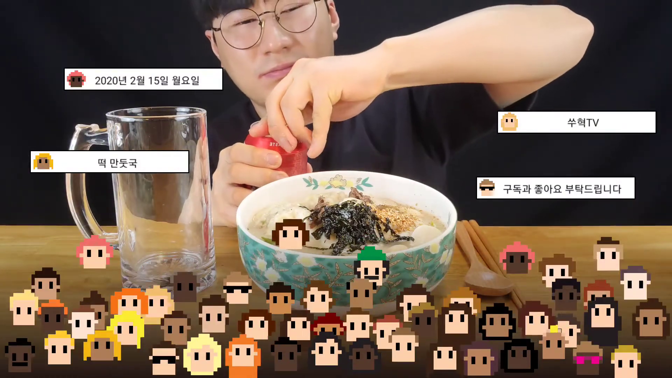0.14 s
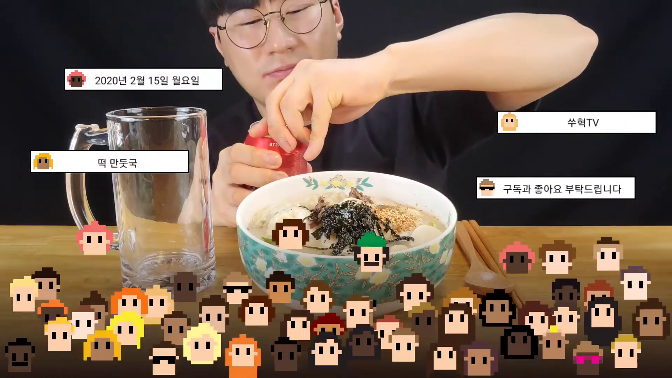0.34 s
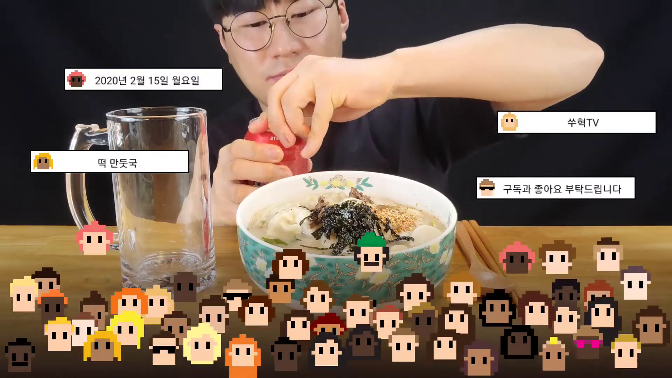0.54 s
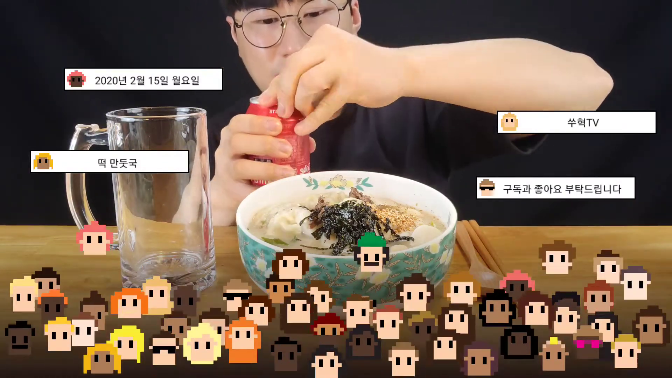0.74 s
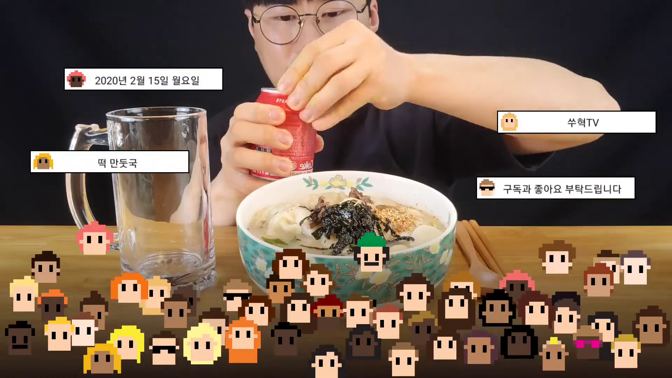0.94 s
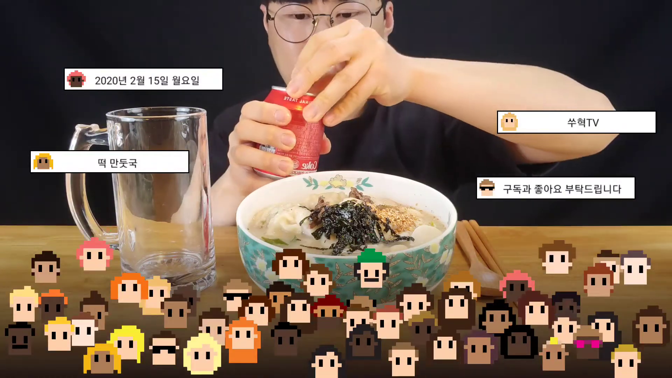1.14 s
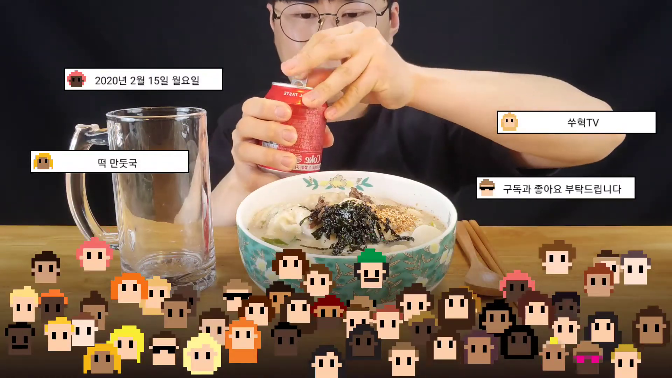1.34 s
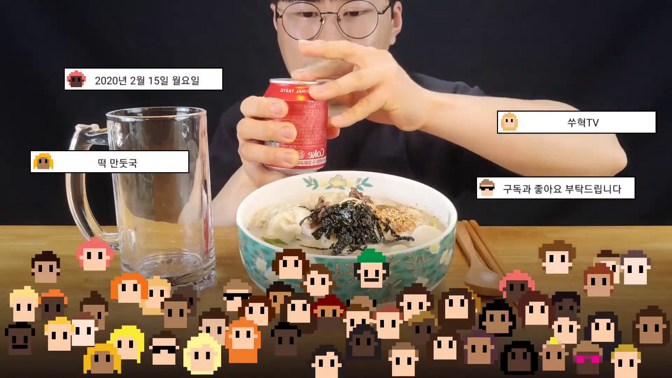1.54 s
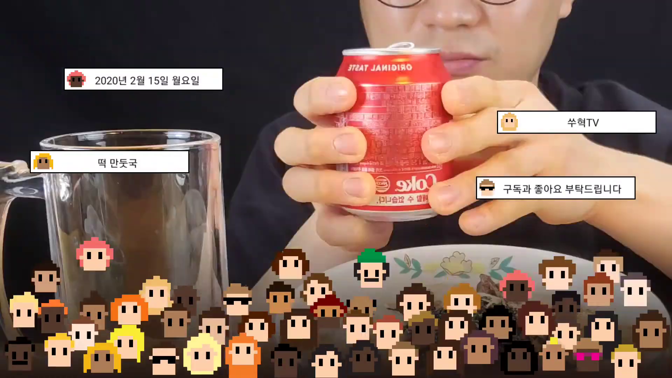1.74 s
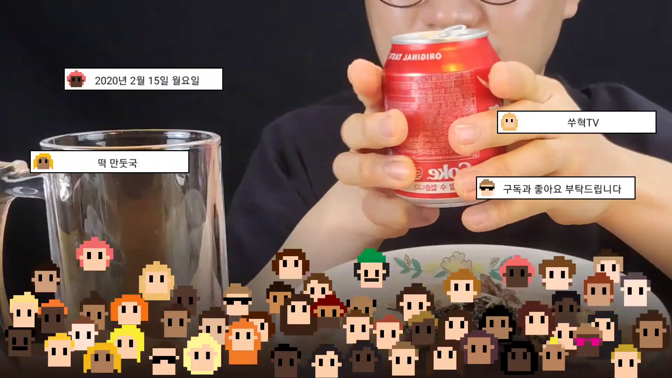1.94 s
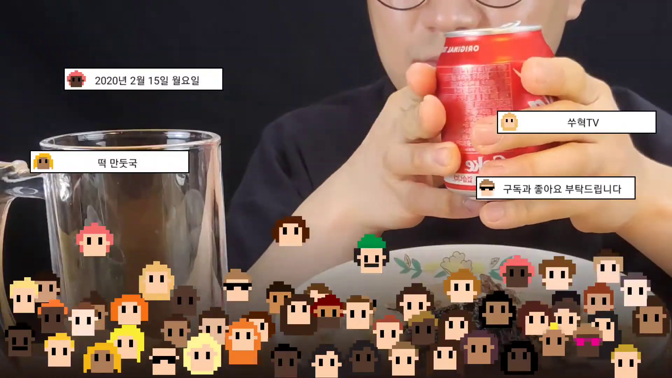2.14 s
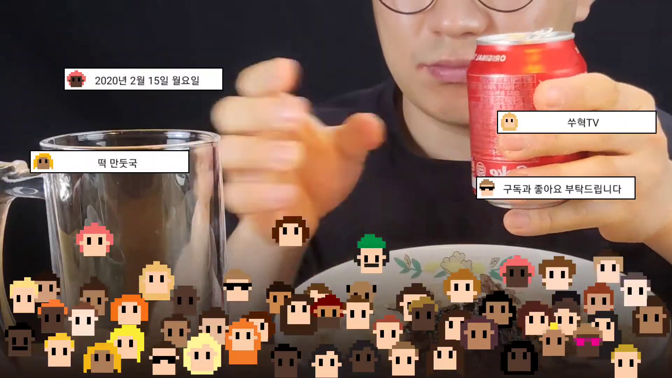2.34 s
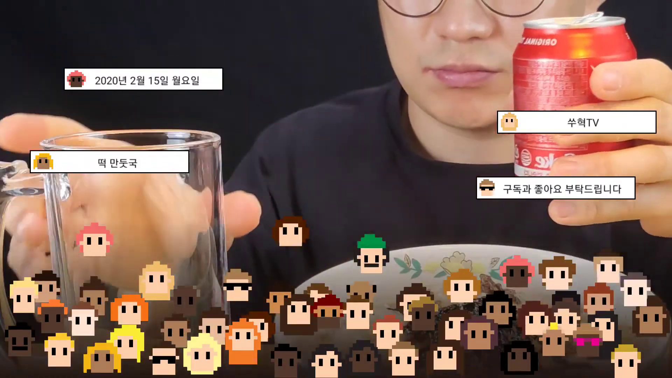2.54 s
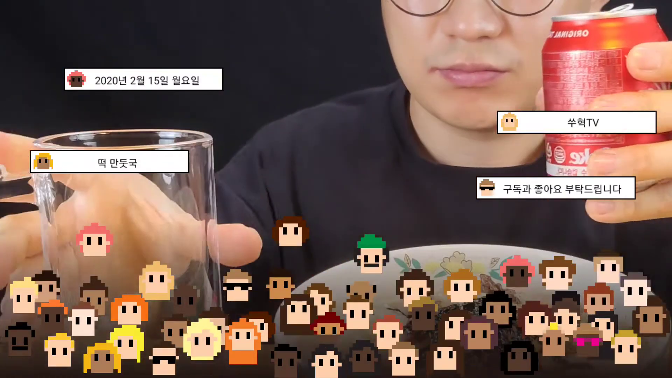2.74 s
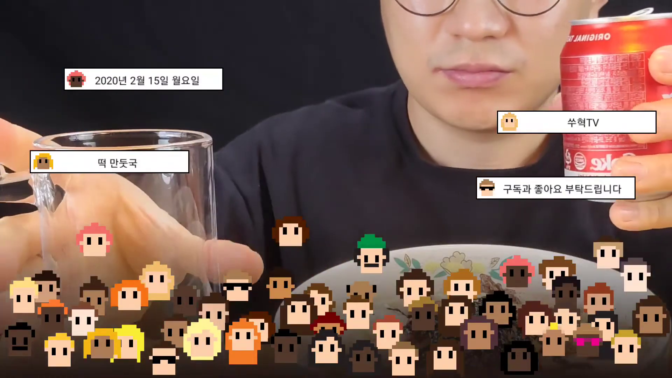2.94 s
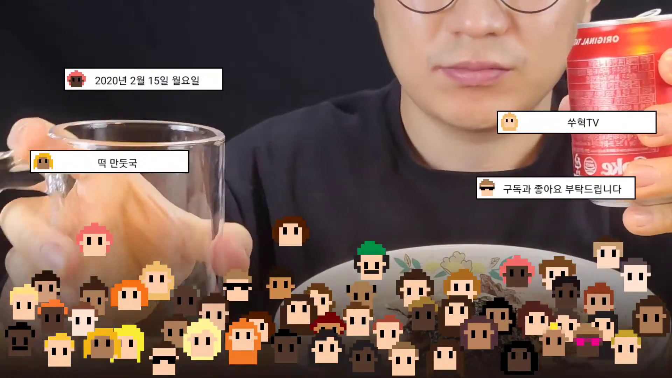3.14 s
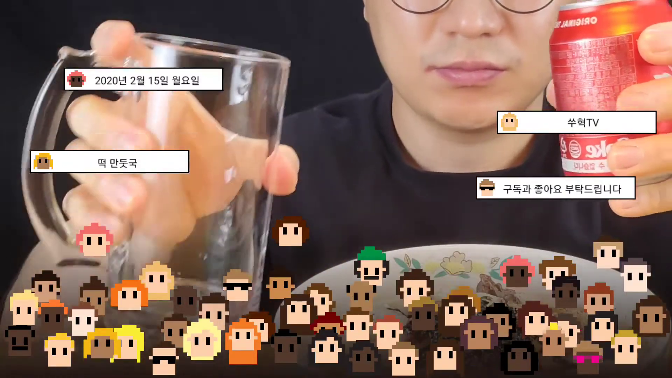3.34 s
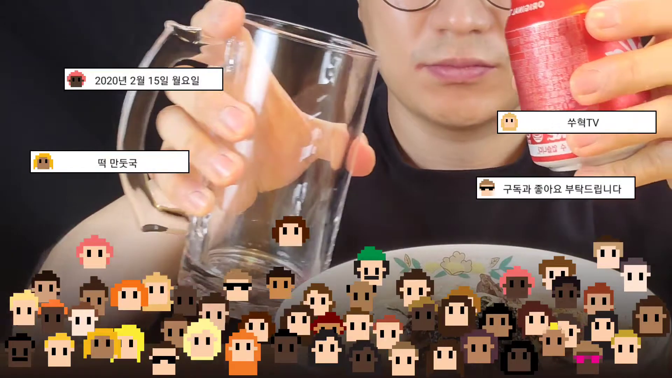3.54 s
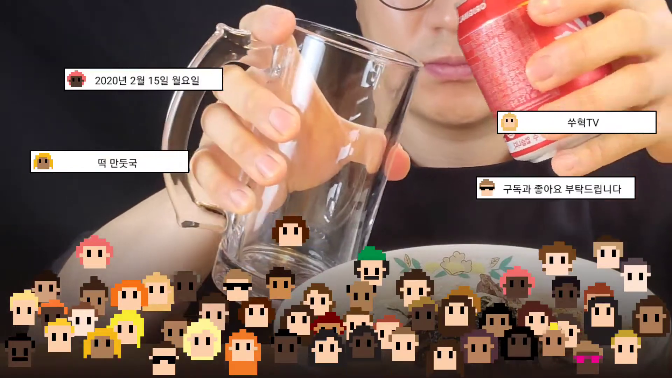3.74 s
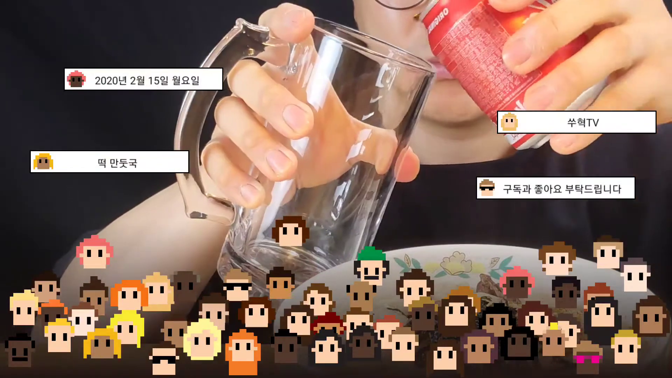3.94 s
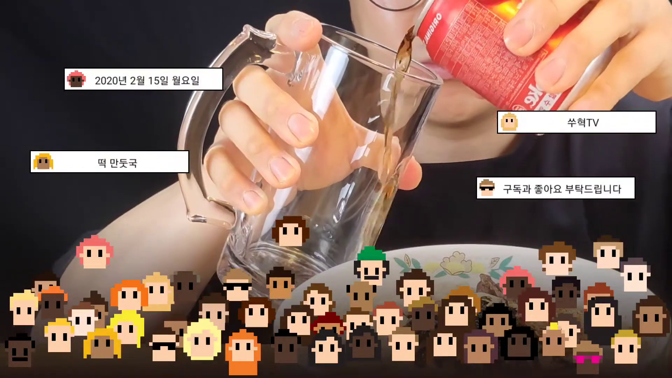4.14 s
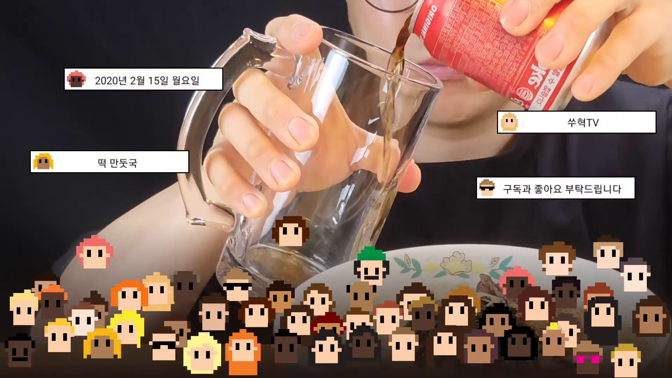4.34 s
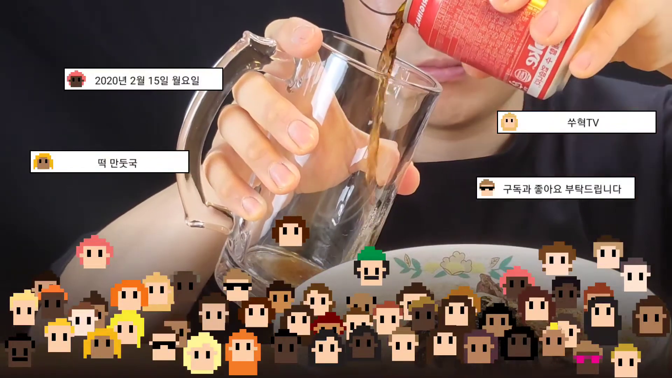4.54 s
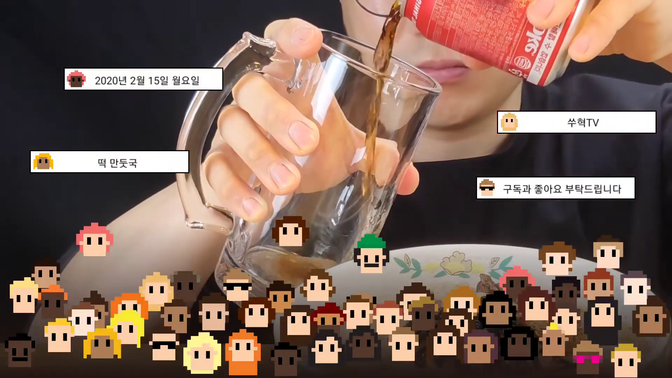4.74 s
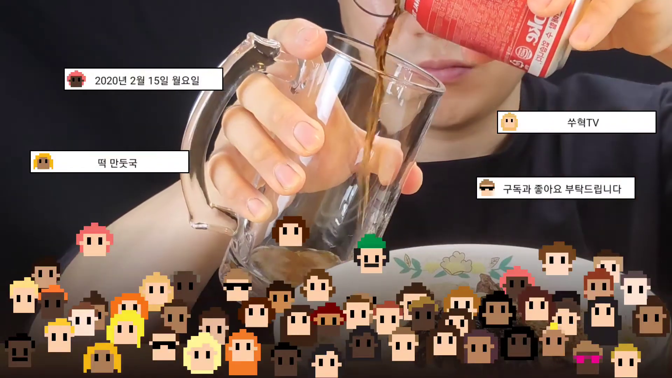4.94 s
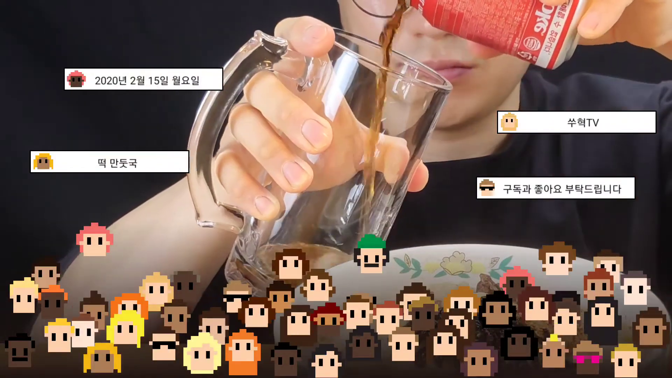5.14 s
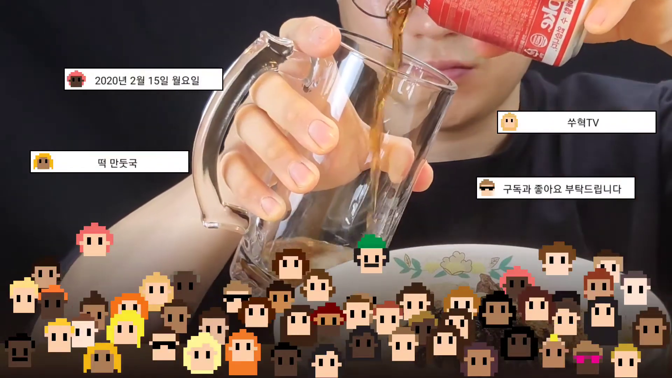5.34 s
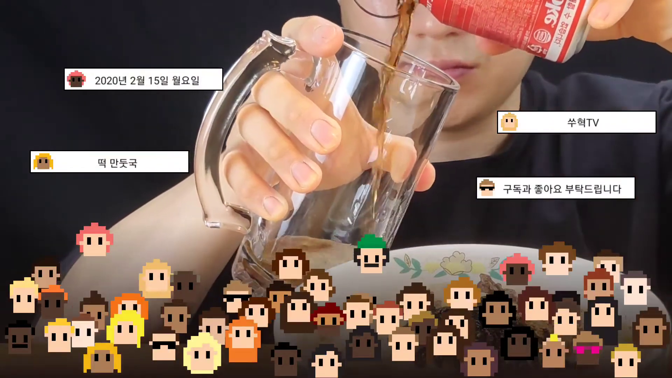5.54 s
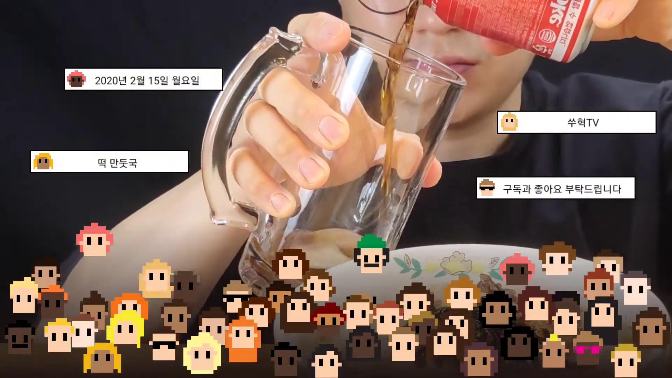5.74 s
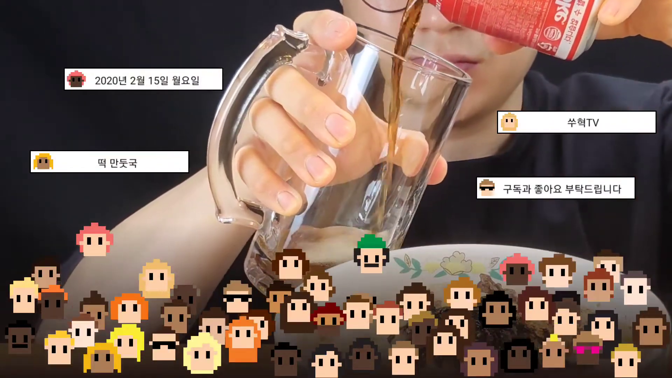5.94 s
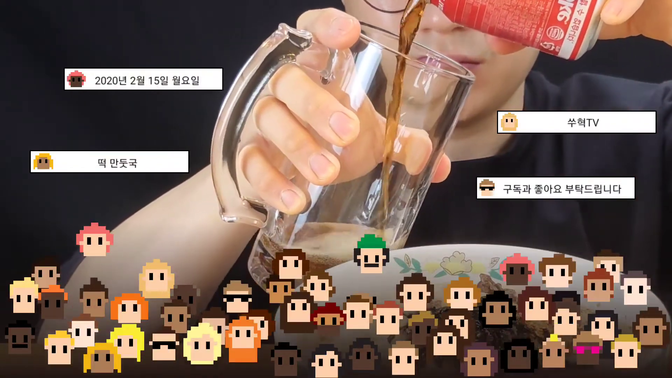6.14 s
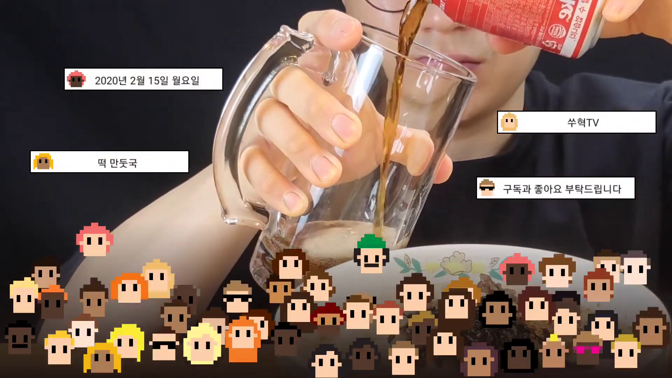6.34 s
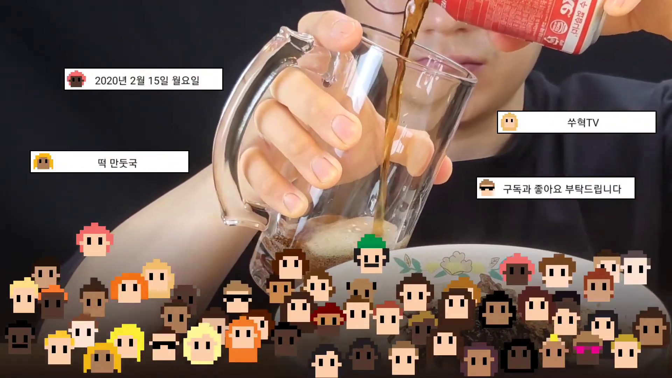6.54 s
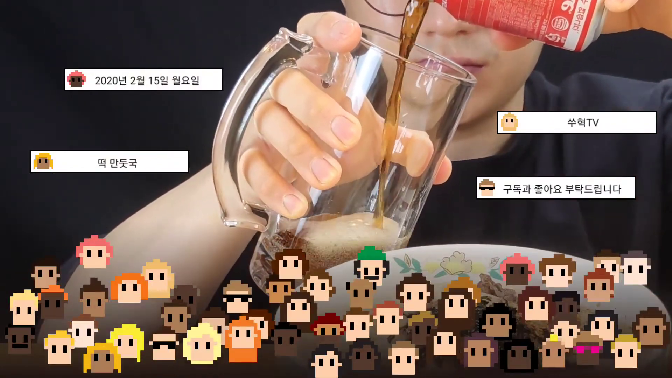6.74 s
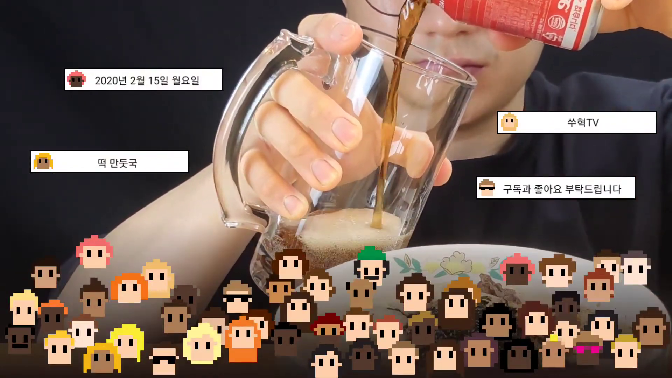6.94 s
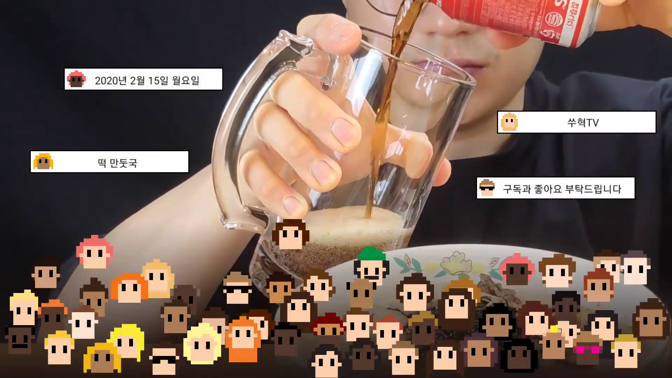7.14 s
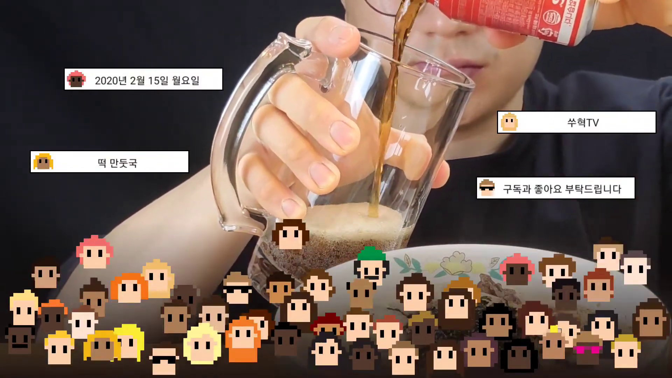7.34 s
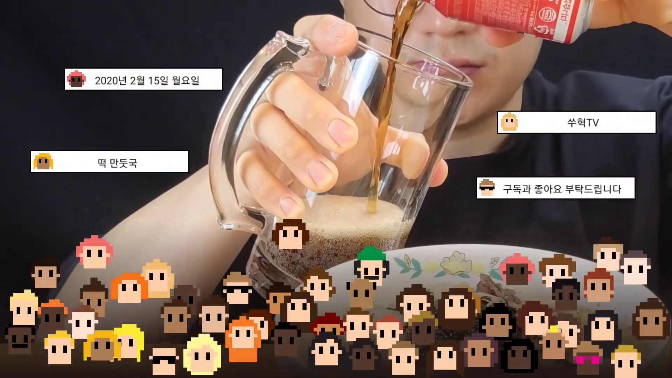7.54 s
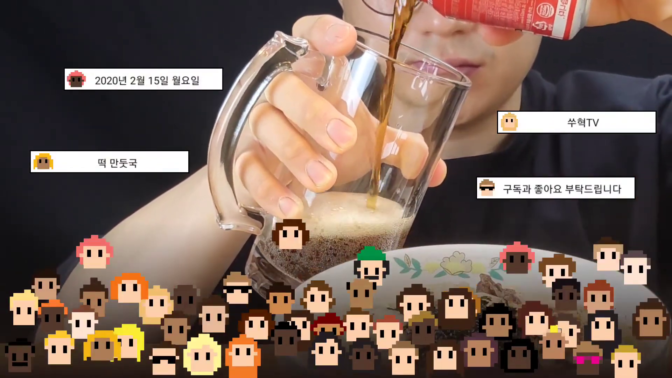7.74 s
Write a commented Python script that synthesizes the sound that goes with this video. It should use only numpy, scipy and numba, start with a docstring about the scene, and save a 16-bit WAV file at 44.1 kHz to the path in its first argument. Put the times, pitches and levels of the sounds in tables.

```python
"""Opening a can and pouring a fizzy drink

Over a background of rumble and hiss, a can is cracked open close by: gas bursts, tab ticks, pops of the thin wall.
A glass mug scrapes over the table in short pulls of stick and slip, which shake the notes of the wood.
The drink glugs, slaps and plops into the mug as short sliding tones, while random drops ring
an air column that rises in pitch as the mug fills, and foam fizzes as bursting treble noise."""
import sys
import numpy as np
from scipy import signal
from scipy.fft import rfft, irfft, next_fast_len
from scipy.io import wavfile
from scipy.ndimage import uniform_filter1d
from numba import njit

SR = 44100
rng = np.random.default_rng(int(sys.argv[2]) if len(sys.argv) > 2 else 0)


def persist_wave(psi):
    """Save psi, clipped to +-1, as 16-bit WAV."""
    counts = np.round(np.clip(psi, -1, 1) * 32767).astype(np.int16)
    wavfile.write(sys.argv[1], SR, np.atleast_2d(counts).T)


N = 342657  # length in samples

# Tone colour of the noise at the lid. Each row: pitch in Hz, strength in dB per Hz.
LID_COLOUR = [(290, -66), (500, -30), (1020, -31), (1340, -4.5), (1570, -3), (2130, 5.5), (4210, -10),
              (4530, -9.5), (6700, -12.5), (12000, -16), (13400, -25), (14900, -25), (16000, -50)]
# Notes of the metal lid. Each row: pitch in Hz, width in Hz, level in dB.
LID_MODES = [(1850, 52, -13.5), (4040, 53, 0), (4350, 37, 6), (4400, 88, 3), (4960, 140, -6),
             (6510, 100, -16), (8100, 110, -33.5), (8800, 110, -16), (8800, 140, -17), (9100, 100, 3),
             (11000, 260, -18.5), (11900, 150, -40)]
# Metal cracks and gas bursts out. Each row: start in seconds, level in dB, ring pitch in Hz, ring level in dB,
# low noise in dB, treble in dB, basic fade time in seconds.
BURSTS = [(0.343, -20, 2600, -27, -22, -1, 0.02), (0.3655, -22, 2580, -37, -37, 4.5, 0.072),
          (0.377, -26.5, 1450, -34, -30, 4.5, 0.28), (0.4216, -12.5, 2620, -29, -5, 1.5, 0.042),
          (0.4336, -8, 1285, -10, -19, -6, 0.16), (0.457, -12, 1350, -19, -31, -7, 0.18),
          (0.5703, -16, 1570, -17, -24, -2, 0.047), (0.583, -27, 1504, -8.5, -19.5, 0, 0.17),
          (1.2608, -2, 2320, -16, 1, -15.5, 0.043), (1.2658, -11, 2040, -13.5, -28, -10.5, 0.22),
          (1.284, -18, 2360, -17, -1, -6.5, 0.18)]
# Notes of the table top, the boom first. Each row: pitch in Hz, level in dB, ring length in seconds.
TABLE_MODES = [(190.4, 1.5, 0.97), (280, 1, 0.35), (412, 7.5, 0.2), (550, -13, 0.91), (655, -19, 0.16),
               (750, -3.5, 0.4), (866, 0, 0.42), (930, -44, 0.24), (1030, -39, 0.54)]
# The flow of the pour. Each row: time in seconds, then air column, splash, froth and fizz in dB.
POUR_LEVELS = [(4.2, -65, -67, -52, -62), (4.35, -69, -72, -59, -47), (4.55, -47.5, -41, -44, -43.5),
               (4.8, -55, -36.5, -75, -39.5), (5.0, -39, -37.5, -52, -34), (5.12, -43, -33, -43, -39),
               (5.5, -31.5, -35, -42, -37.5), (5.75, -26.5, -35.5, -53, -38.5), (5.9, -38, -37, -56, -42),
               (6.2, -39, -39.5, -47, -43), (6.4, -35.5, -36.5, -41.5, -42), (6.81, -35, -35.5, -42, -43),
               (7.1, -35, -33, -41, -38.5), (7.66, -28, -26, -38.5, -32.5), (7.77, -30, -25.5, -42, -31.5)]
# The stream slaps the glass. Each row: start in seconds, level in dB, pitch in Hz.
SLAPS = [(4.4674, -15, 3680), (4.5221, -21, 3490), (4.612, -2.5, 2330), (4.6264, -2, 2160),
         (4.6707, -1.5, 1830), (4.6975, -6.5, 3760), (4.7248, -0.5, 3530), (4.814, -13, 3480),
         (4.8674, -4.5, 1520), (4.9011, -0.5, 1600), (4.9561, -7.5, 1650), (4.976, -8, 1640),
         (4.9866, -9, 3600), (5.007, 2.5, 1630), (5.051, -1.5, 1360), (5.0875, 1, 1500), (5.116, -1, 1090),
         (5.16, -8, 3430), (5.237, -8, 3650), (5.252, 1, 1600), (5.2968, -1, 1770), (5.3124, -6, 1380),
         (5.3815, -1.5, 1270), (5.4568, -6.5, 3220), (5.4671, -3.5, 1350), (5.55, -3, 1610),
         (5.6107, -7, 1370), (5.627, -5, 1660), (5.6883, 0, 3560), (5.7264, -7, 1560), (5.7675, -3, 3420),
         (5.793, -16, 3520), (5.8625, -7.5, 1820), (5.8935, -9, 1320), (5.913, -10.5, 3720),
         (5.9587, -4, 1360), (5.9953, -10, 1640), (6.041, -5, 1530), (6.0821, -8.5, 1840),
         (6.1706, -10.5, 1800), (6.1877, -11.5, 1440), (6.2721, -11, 1810), (6.356, -20, 1830),
         (6.42, -17, 1630), (6.447, -18, 1790), (6.464, -20, 1820), (6.4925, -13.5, 1860),
         (6.626, -17, 1790), (6.5573, -17.5, 1790), (6.5836, -17, 1430), (6.8682, -17, 1730),
         (7.1336, -22, 1850), (7.483, -12, 1280), (7.644, -12, 1270)]
# Big bubbles close in the pool. Each row: start in seconds, level in dB, pitch in Hz, cycles until faded.
PLOPS = [(4.866, -24, 603, 11), (5.026, 0.5, 1080, 6.1), (5.05, -10, 610, 15), (5.071, 10.5, 697, 7.5),
         (5.115, 7, 607, 6), (5.27, 1, 1170, 10), (5.297, -7.5, 1030, 18), (5.313, -17, 617, 19),
         (5.38, -6.5, 840, 30), (5.393, -5, 900, 17), (5.409, 5, 660, 15.5), (5.424, -8, 640, 17),
         (5.446, -8, 680, 19), (5.467, 0.5, 830, 12.5), (5.543, 4, 622, 16.2), (5.614, 2.5, 690, 19),
         (5.698, 6, 675, 16), (5.712, 0, 800, 18), (5.726, -2, 700, 13), (5.741, 5.5, 675, 13),
         (5.777, -7, 627, 15), (5.796, -6.5, 797, 25), (5.834, -18, 800, 19), (5.858, 2.5, 732, 25),
         (5.895, 3, 644, 18.3), (5.914, -1.5, 613, 16), (5.959, -5.5, 620, 15), (5.989, 3.5, 625, 20),
         (6.027, -5.5, 607, 17), (6.056, -1.5, 655, 15), (6.084, 0, 667, 23), (6.123, -15, 615, 12),
         (6.136, -5, 640, 18), (6.171, 0, 627, 13.5), (6.19, -4, 633, 19), (6.272, -10, 610, 9.9),
         (6.302, -13, 595, 10), (6.315, -13, 654, 16), (6.356, -8, 536, 9.7), (6.382, -13, 640, 9.4),
         (6.491, -14.5, 516, 9.1), (6.558, -12.5, 620, 8.4), (6.868, -12.5, 690, 9.9),
         (6.902, -14, 680, 22), (6.949, -10.5, 720, 17.5), (6.973, -15, 646, 19), (7.006, -9.5, 750, 16.4),
         (7.122, -13, 720, 23), (7.134, -12, 700, 20), (7.164, -14, 688, 23), (7.183, -11.5, 702, 34),
         (7.221, -10, 722, 23), (7.247, -13, 698, 31), (7.277, -8.5, 707, 18), (7.421, -12, 724, 27),
         (7.465, -12, 770, 19), (7.483, -6.5, 694, 19.5), (7.502, -20, 694, 13), (7.614, -14, 720, 30),
         (7.647, -5, 725, 12), (7.677, -5.5, 702, 16), (7.711, -17, 708, 13)]

# How much louder the left side is, in dB
BURST_PAN_DB, SLIDE_PAN_DB, RUMBLE_PAN_DB, POUR_PAN_DB = 1.5, 4, -4.5, 4


def undb(db):
    """Decibels to gain."""
    return 10 ** (np.asarray(db) / 20)


def unit(x):
    """Scale to an rms (average strength) of 1."""
    return x / np.sqrt(np.mean(x ** 2))


def peak(x):
    """Scale to a largest swing of 1."""
    return x / np.abs(x).max()


def curves(table):
    """Columns of a table at every sample, then a gate that is 0 before its start and soon after its end."""
    s, *columns = np.transpose(table)
    t = np.arange(N) / SR
    gate = np.clip(np.minimum(t - s[0], s[-1] - t + 0.036) / 0.026, 0, 1)
    return [np.interp(t, s, c) for c in columns] + [gate]


def tinted(points, lo_hz=0, hi_hz=SR):
    """Noise with a spectrum drawn through (Hz, dB) points, kept between two soft edges."""
    n = next_fast_len(N)
    f = np.maximum(np.fft.rfftfreq(n, 1 / SR), 1)
    hz, db = np.transpose(points)
    colour = undb(np.interp(np.log(f), np.log(hz), db))
    edges = 1 / (1 + (lo_hz / f) ** 6) / (1 + (f / hi_hz) ** 6)
    return unit(irfft(rfft(rng.standard_normal(n)) * colour * edges, n)[:N])


def wide(points, lo_hz, share):
    """Treble noise that differs between the sides by the given share."""
    middle = tinted(points, lo_hz=lo_hz)
    return middle + share * tinted(points, lo_hz=lo_hz) * np.array([[1], [-1]])


def walk(rate):
    """Random levels, a new one every 1 / rate seconds, joined by straight slopes; spread near 1."""
    k = int(SR / rate)
    return uniform_filter1d(np.repeat(rng.standard_normal(N // k + 1), k), k)[:N]


def crackle(rate, spread_db):
    """Clicks at random moments, rate per second, a few much louder than the rest."""
    chance = rng.random((N, 2))
    happens = chance[:, 0] < rate / SR
    return happens * undb(-spread_db * np.log(1 - chance[:, 1])) * rng.choice([-1, 1], N)


def place(x, pan_db):
    """Two channels, the left louder by pan_db."""
    return x * undb(np.array([pan_db / 2, -pan_db / 2])).reshape(2, -1)


@njit
def svf(x, hz, width):
    """State-variable band-pass: a resonance whose centre can move, gain 1 there."""
    y, b, l = np.empty(len(x)), 0., 0.
    for i in range(len(x)):
        g, k = np.tan(np.pi * hz[i] / SR), width / hz[i]
        v = (b + g * (x[i] - l)) / (1 + g * (g + k))
        b, l, y[i] = 2 * v - b, l + 2 * g * v, k * v
    return y


def band(x, hz, width):
    """Fixed band-pass: a resonance with gain 1 at the centre."""
    w = 2 * np.pi * hz / SR
    a = np.sin(w) * width / hz / 2
    return signal.lfilter([a, 0, -a], [1 + a, -2 * np.cos(w), 1 - a], x)


def rung(push, hz, width):
    """A short push through one resonance, with time to ring out."""
    return band(np.append(push, np.zeros(int(2.5 * SR / width))), hz, width)


def add(out, s, sound, pan_db):
    """Mix a short sound in at a time and a side."""
    i = int(s * SR)
    n = min(sound.shape[-1], N - i)
    out[:, i:i + n] += place(sound[..., :n], pan_db)


def ring(hz, t60, glide=0., rise=0.00018):
    """A sine that fades 60 dB in t60 seconds while its pitch slides by the share glide."""
    t = np.arange(int(t60 * SR) + 8) / SR
    tone = np.sin(2 * np.pi * hz * t * (1 + glide * t / t60 / 2))
    return tone * undb(-60 * t / t60) * (1 - np.exp(-t / rise))


def puff(noise, s, t60, rise):
    """A piece of the noise, taken from time s, that swells and then fades."""
    t = np.arange(int(t60 * SR) + 8) / SR
    piece = noise[..., (int(s * SR) + np.arange(len(t))) % N]
    shape = undb(-60 * t / t60) * (1 - np.exp(-t / rise)) ** 2
    return piece * shape / shape.max()


def swell(s, hold, db, attack, fade_db_s):
    """Gain of events that rise, hold and fade; the power of all is summed."""
    power = np.zeros(N)
    for start, length, level_db in np.broadcast(s, hold, db):
        i = int(start * SR)
        t = np.arange(min(SR, N - i)) / SR
        gain = undb(level_db - fade_db_s * np.maximum(t - length, 0)) * np.minimum(t / attack, 1)
        power[i:i + len(t)] += gain ** 2
    return np.sqrt(power)


def background():
    """Rumble and hiss behind the near sounds: the room tone, and a treble haze as the pour begins.

    Each band is noise partly shared by both sides; the deepest shared part is in opposite phase."""
    # Background level: high at first, sinks after the can cracks open, swells again around the mug scrapes
    # and the pour. Each row: time in seconds, then deep, bass, mid hiss and treble hiss in dB.
    background_levels = [(0.0, -62, -38, -48, -51.5), (0.34, -64, -38.5, -45.5, -52),
                         (0.52, -64, -56.5, -60, -55), (0.8, -82, -55, -56.5, -66),
                         (1.1, -77, -57, -68, -66.5), (1.5, -82, -53, -61, -61.5),
                         (1.95, -59, -53, -61, -59.5), (2.3, -58, -49, -54.5, -53.5),
                         (2.65, -60, -37, -47, -49), (2.8, -33.5, -42, -46, -46.5),
                         (3.05, -45, -28, -49, -49), (3.3, -39, -43, -51, -49),
                         (3.62, -47, -51, -52.5, -48), (3.9, -46.5, -36, -47, -49.5),
                         (4.5, -45.5, -39.5, -45.5, -42), (5.2, -45, -37.5, -62, -58),
                         (5.8, -59, -48.5, -62, -62), (7.1, -61, -45.5, -64, -62),
                         (7.5, -51, -41.5, -62, -62), (7.77, -55, -43, -62, -62)]
    # Each row: pitch in Hz, strength in dB per Hz.
    background_colour = [(15, -45.5), (25, -23), (59, 5), (185, 0), (463, -8), (641, -18.5), (887, -18.5),
                         (1020, -25.5), (1230, -19.5), (1700, -26.5), (2110, -23.5), (2410, -25),
                         (3620, -28), (14800, -29.5), (16000, -32)]
    deep_db, bass_db, hiss_db, treble_db, _ = curves(background_levels)
    # Each row: lower and upper edge in Hz, gain, waver in dB, shared part on the left and on the right.
    bands = [(0, 94, undb(deep_db + 6.5), 3.5, 0.6, -0.18),
             (82.0, 1200, undb(bass_db), 3.5, 0.49, 0.38),
             (680, 5300, undb(hiss_db), .8, 0.56, 0.42),
             (4230, SR, undb(treble_db), .8, 0.52, 0.27)]
    out = 0
    for lo_hz, hi_hz, gain, waver_db, left, right in bands:
        noise = tinted(background_colour, lo_hz, hi_hz)
        own = np.array([np.roll(noise, N // 3), np.roll(noise, -N // 3)])  # far-off pieces sound unrelated
        both = np.array([[left], [right]]) * noise + 0.68 * own
        out = out + gain * undb(waver_db * walk(6.9)) * both
    return out


def sputter():
    """Escaping gas sputters: a quick random wavering of the level."""
    return undb(1.5 * walk(150))


def lid_body():
    """Middle noise of gas and metal: coloured noise, the lid's own notes and one broad ring."""
    white = rng.standard_normal(N)
    metal = unit(sum(undb(db) * unit(band(white, hz, w)) for hz, w, db in LID_MODES))
    broad = undb(-6) * unit(band(white, 4620, 520))
    return sputter() * (tinted(LID_COLOUR, 2950, 8100) + 0.32 * metal + broad)


def lid_rows():
    """Ticks, bursts and rubs in one form: the columns of BURSTS, then left minus right in dB and rise in seconds."""
    # The tab ticks. Each row: start in seconds, level in dB, ring pitch in Hz, ring level in dB, treble in dB.
    tick_rows = [(0.2684, -33, 1360, -4.5, -22), (0.742, -42, 1640, -5, -5), (0.8814, -29.5, 1570, 0, -11),
                 (1.087, -43.5, 1830, 7, -11), (1.0974, -36.5, 2700, 7.5, -4.5),
                 (1.43, -34, 2600, 5.5, -0.5), (1.509, -25, 1920, -4.5, -5), (1.557, -26.5, 1940, -16, -6),
                 (1.6017, -28, 1900, -9, -21), (1.716, -40.5, 1730, -10, -6),
                 (1.7939, -32, 1900, -16, -5.5), (1.8961, -12, 3020, -41, -26), (2.264, -32, 1880, -3, -10)]
    # A finger rubs over the lid. Each row: start in seconds, level in dB, ring pitch in Hz,
    # basic fade time in seconds.
    rub_rows = [(0.635, -50, 1660, 0.044), (0.775, -38.5, 1690, 0.082), (0.989, -36.5, 1950, 0.072),
                (1.403, -46, 1970, .075), (1.49, -44, 1900, 0.061), (1.612, -39, 1790, 0.026),
                (3.47, -48.5, 3920, 0.1)]
    rows = [(s, db, hz, ring_db, -6.5, treble_db, 0.019, 3.5, 0.00046)
            for s, db, hz, ring_db, treble_db in tick_rows]
    rows += [(*row, BURST_PAN_DB, 0.00025) for row in BURSTS]
    rows += [(s, db, hz, -1, 3.0, -12, t60, 3.5, .02) for s, db, hz, t60 in rub_rows]
    return rows


def lid_touches(body):
    """Each touch or burst is low, middle and treble noise, and drives a ring of the head space in the can."""
    out = np.zeros((2, N))
    white = rng.standard_normal(N)
    low = sputter() * tinted(LID_COLOUR, hi_hz=2700)
    treble = sputter() * wide(LID_COLOUR, 7200, 0.98)
    for s, db, hz, ring_db, low_db, treble_db, t60, pan_db, rise in lid_rows():
        add(out, s, undb(db - 12.5) * puff(body, s, t60, rise), pan_db)
        add(out, s, undb(db + low_db - 15.5) * puff(low, s, t60, rise), pan_db)
        add(out, s, undb(db + treble_db - 6.0) * puff(treble, s, 0.76 * t60, rise), pan_db)
        head_space = rung(puff(white, s, 1.18 * t60, rise), hz, .085 * hz)
        add(out, s, undb(db + ring_db + 18.5) * head_space, pan_db)
    return out


def tearing_metal():
    """At each burst, tearing metal strikes the lid's own notes with a very short push of noise."""
    out = np.zeros((2, N))
    white = rng.standard_normal(N)
    for s, db, *_ in BURSTS:
        for hz, width, mode_db in LID_MODES:
            note = rung(puff(white, s + 0.14, 0.0083, .0002), hz, .4 * width)
            add(out, s, undb(db + mode_db + 8.5) * note, BURST_PAN_DB)
    return out


def lid_knocks():
    """The tab knocks the lid down: a dull, heavily damped resonance."""
    # Each row: start in seconds, peak in dB.
    knock_rows = [(0.434, -21), (1.258, -21)]
    out = np.zeros((2, N))
    white = rng.standard_normal(N)
    for s, db in knock_rows:
        add(out, s, undb(db) * peak(rung(puff(white, s, .015, .001), 450, 900.)), 1.5)
    return out


def bubble_pings():
    """Bubbles ping inside the open can: random clicks through its resonances."""
    # Each row: time in seconds, level in dB.
    ping_levels = [(1.8, -54), (2.2, -58.5), (2.8, -48.5), (3.4, -54), (4.2, -56)]
    # What the bubbles ring. Each row: pitch in Hz, width in Hz, level in dB.
    ping_modes = [(1160, 130, -4.5), (1880, 39, -10), (3480, 840, -8), (6500, 940, -2.5)]
    level_db, on = curves(ping_levels)
    bubbles = crackle(500, 2.8)
    pings = 0
    for k, (hz, width, db) in enumerate(ping_modes):
        shifted = np.roll(bubbles, 7919 * k)  # each resonance gets its own moments
        pings = pings + undb(db) * unit(band(shifted, hz, width))
    return place(on * undb(level_db) * pings, -1.0)


def wall_pops(body):
    """The can wall pops under the fingers: a note that slides down, and higher notes of the thin metal."""
    # Each row: start in seconds, level in dB, basic pitch in Hz, fade time in seconds, left minus right in dB.
    wall_rows = [(2.334, -4, 1065, 0.041, 0.5), (3.295, -21.5, 1220, 0.014, -2.0),
                 (3.694, -18, 1048, 0.035, 0), (3.704, -18.5, 1190, 0.046, 1)]
    # Higher notes of the wall. Each row: pitch in Hz, level in dB, fade time in seconds.
    wall_modes = [(2210, -26, 0.031), (2830, -37, 0.043), (3930, -21, 0.018), (4930, -25, 0.026),
                  (6100, -13, 0.01)]
    out = np.zeros((2, N))
    white = rng.standard_normal(N)
    for s, db, hz, t60, pan_db in wall_rows:
        add(out, s, undb(db + 9.0) * ring(1.03 * hz, t60, glide=-0.247, rise=0.0078), pan_db)
        slosh = rung(puff(white, s, 0.28, 0.0015), 0.96 * hz, 78.0)  # the drink sloshes on
        add(out, s, undb(db - 9.0) * slosh, pan_db)
        add(out, s, undb(db - 25.5) * puff(body, s, 0.018, 0.00038), pan_db)
        for mode_hz, mode_db, mode_t60 in wall_modes:
            add(out, s, undb(db + mode_db) * ring(mode_hz, mode_t60), pan_db)
    return out


def can():
    """All sounds of the can: gas and metal at the lid, bubbles inside and pops of the wall."""
    body = lid_body()
    return lid_touches(body) + tearing_metal() + lid_knocks() + bubble_pings() + wall_pops(body)


def mug_pulls():
    """Stick and slip of the mug's foot: random slips shake the table notes, and grit hisses on top."""
    # The mug is dragged in short pulls. Each row: start in seconds, length in seconds,
    # then scrape, rumble and grit in dB.
    pull_rows = [(2.612, 0.083, -13.5, -16, -37), (2.767, 0.024, -22.5, -26.5, -52),
                 (2.965, 0.034, -20, -32, -44), (3.037, 0.0093, -8.5, -12, -56),
                 (3.106, 0.011, -18.5, -36, -37), (3.201, 0.5, -52, -38.5, -76),
                 (3.68, 0.0095, -41, -47, -46)]
    s, hold, scrape_db, rumble_db, grit_db = np.transpose(pull_rows)
    attack_s = 0.013
    scraping = swell(s, hold, scrape_db, attack_s, fade_db_s=278)
    rumbling = swell(s, hold, rumble_db, attack_s, fade_db_s=114)
    gritting = swell(s, hold, grit_db, attack_s, fade_db_s=160)
    slips, white = crackle(1200, 0.69), rng.standard_normal(N)
    scrape = sum(undb(db) * unit(band(slips, hz, 5.1 / t60)) for hz, db, t60 in TABLE_MODES[1:])
    boom = unit(band(slips, TABLE_MODES[0][0], 9.2))
    thrum = np.array([unit(band(band(np.roll(white, k), 130, 150), 120, 170)) for k in (0, N // 2)])
    grit = band(band(band(slips + 0.27 * white, 2350, 1700), 1950, 1800), 1850, 1700)
    wood = place(scraping * undb(-12) * unit(scrape), SLIDE_PAN_DB)
    wood = wood + place(rumbling * (undb(-6) * thrum + undb(-7.0) * boom), RUMBLE_PAN_DB)
    return wood, place(gritting * undb(-5.5) * unit(grit), SLIDE_PAN_DB)


def mug_jerks():
    """The mug catches and jerks: each jerk is a dull knock and sets off the notes of the table."""
    # Each row: start in seconds, level in dB.
    jerk_rows = [(2.619, -1.5), (2.637, -7.5), (2.655, -14), (2.69, -20), (2.735, -23.5), (2.797, -37),
                 (2.97, -19), (3.046, -37), (3.059, -15.5), (3.124, -15)]
    out = np.zeros((2, N))
    white = rng.standard_normal(N)
    dull = unit(band(white, 700, 690.0))
    for s, db in jerk_rows:
        add(out, s, undb(db - 16.5) * puff(dull, s, 0.13, 0.0014), SLIDE_PAN_DB)
        for hz, mode_db, t60 in TABLE_MODES:
            note = peak(rung(puff(white, s + t60, 0.094, 0.00055), hz, 9.4 / t60))
            pan_db = RUMBLE_PAN_DB if hz == TABLE_MODES[0][0] else SLIDE_PAN_DB
            add(out, s, undb(db + mode_db - 12.5) * note, pan_db)
    return out


def slide():
    """The dragged mug shakes the table top, which booms on; thick wood is dull."""
    wood, grit = mug_pulls()
    dull_wood = signal.butter(4, 1300, fs=SR, output="sos")
    return signal.sosfilt(dull_wood, wood + mug_jerks()) + grit


def column_pitch():
    """Pitch in Hz of the air column, which shortens as the mug fills."""
    pool_s, pool_hz, rise_hz_s = 5.0, 625, 31.3  # when a pool has formed, pitch then, rise per second
    return pool_hz + rise_hz_s * (np.arange(N) / SR - pool_s)


def air_in_mug():
    """Random drops excite the air column, froth and middling bubbles; the pool churns on after each plop."""
    column_db, _, froth_db, _, on = curves(POUR_LEVELS)
    s, plop_db = np.array(PLOPS)[:, :2].T
    stir = swell(s, 0.0033, plop_db, 0.0026, fade_db_s=267)
    drops = crackle(1100, 2.6)
    wobble = column_pitch() * (1 + 0.045 * walk(25))  # the sloshing surface shortens and lengthens the column
    column = unit(svf(svf(drops, wobble, 116.0), wobble, 240.0))
    froth = undb(froth_db - 3.5) * unit(band(band(drops, 345, 190), 283, 270))
    throat = 920 * (1 + 0.19 * walk(30))  # middling bubbles of ever-changing size, in Hz
    gurgle = unit(svf(svf(np.roll(drops, N // 2), throat, 137.0), throat, 500.0))
    column = (undb(column_db - 3) + undb(-31.5) * stir) * column
    return place(on * (column + froth + undb(-28) * stir * gurgle), POUR_PAN_DB)


def glass_noise():
    """Random drops of spray ring the notes of the glass mug."""
    # Each row: pitch in Hz, width in Hz, level in dB.
    mug_modes = [(920, 50, -5), (1420, 43, -4), (1516, 120, -0.5), (1785, 58, 10), (2400, 59, -11),
                 (2977, 76, 3), (3530, 110, 8.5)]
    spray = crackle(2500, 2.18)
    return unit(sum(undb(db) * unit(band(spray, hz, w)) for hz, w, db in mug_modes))


def splash_noise(glass):
    """Ringing glass mixed with water noise; the rising drink damps the ring of the glass."""
    damp_db = 3 * np.maximum(np.arange(N) / SR - 6.0, 0)  # 3 dB per second, from 6 s on
    water = unit(band(band(rng.standard_normal(N), 2680, 1500), 2820, 2000))
    return unit(undb(-damp_db) * glass + undb(-2.5) * water)


def stream(splash):
    """The steady splash of the stream, with spray thrown up by each slap."""
    _, splash_db, _, _, on = curves(POUR_LEVELS)
    s, slap_db, _ = np.transpose(SLAPS)
    thrown = undb(-32.5) * swell(s, 0.002, slap_db, 0.001, fade_db_s=318)
    return place(on * (undb(splash_db - 3.5) + thrown) * splash, POUR_PAN_DB)


def foam_noise():
    """Treble noise of the foam, different on the two sides."""
    # Each row: pitch in Hz, strength in dB per Hz.
    fizz_colour = [(2350, -25), (4000, 4), (4620, -1), (5930, 3), (7570, 1.5), (12000, -6), (14700, -5),
                   (16000, -15)]
    return wide(fizz_colour, 4340, 0.52)


def foam_fizz(foam):
    """Foam fizzes: its noise swells briefly at random pops, until a head of foam muffles the bursts."""
    _, _, _, fizz_db, on = curves(POUR_LEVELS)
    bare = np.interp(np.arange(N) / SR, [5.9, 6.2], [1, .25])
    bursting = 1 + 35.0 * bare * uniform_filter1d(np.abs(crackle(200, 4.5)), 60)
    fizz = unit(foam * bursting * undb(1.7 * walk(25)))
    return place(on * undb(fizz_db + 6.0) * fizz, 1.7)


def small_bubbles():
    """Random small bubbles between the big ones: low plops in the pool, and high slaps, as two sounds."""
    column_db, splash_db, *_ = curves(POUR_LEVELS)
    column_hz = column_pitch()
    start, end = POUR_LEVELS[0][0], POUR_LEVELS[-1][0]
    per_s, spread_db, max_db = 160, 3.0, 6.5  # bubbles per second, typical and greatest extra level
    pool, slaps = np.zeros((2, N)), np.zeros((2, N))
    for when, big, pitch, kind in rng.random((int(per_s * (end - start)), 4)):
        s = start + when * (end - start)
        size_db = min(-spread_db * np.log(1 - big), max_db)
        i = min(int(s * SR), N - 1)
        if kind < .3:
            hz = column_hz[i] * (0.847 + .25 * pitch)
            plop = ring(hz, 14 / hz, glide=0.043, rise=0.0046)
            add(pool, s, undb(column_db[i] + 10.5 + size_db) * plop, POUR_PAN_DB)
        else:
            hz = 1150 * 3.4 ** pitch
            add(slaps, s, undb(splash_db[i] + 7.5 + size_db) * ring(hz, 9 / hz, glide=0.06), POUR_PAN_DB)
    return pool, slaps


def bubble_spits(foam):
    """Small bubbles spit: a puff of foam noise and a very short tone that slides up."""
    # Each row: start in seconds, level in dB, pitch in Hz.
    spit_rows = [(4.4328, -22, 7290), (4.6243, -15, 5160), (4.6598, -8.5, 6100), (4.6823, -9.5, 5750),
                 (4.8113, -19, 5700), (4.868, -9.5, 7150), (4.8965, -17, 7200), (4.939, -12, 10500),
                 (4.95, -9.5, 6950), (4.994, -5, 7130), (5.0142, -9, 5600), (5.0368, -7, 10700),
                 (5.0517, -17, 6840), (5.0918, -9.5, 5700), (5.132, -8.5, 6960), (5.162, -9.5, 5560),
                 (5.1857, -10.5, 6150), (5.209, -12, 6980), (5.251, -10, 10540), (5.2634, -10, 5260),
                 (5.364, -8.5, 5870), (5.37, -9.5, 6850), (5.4678, -9, 5600), (5.4877, -12, 5740),
                 (5.6115, -13, 6340), (5.658, -11, 11900), (5.6969, -15, 6480), (5.7273, -14, 5730),
                 (5.7337, -11, 5060), (5.7929, -7, 6470), (5.9184, -9.5, 5730), (5.9384, -9.5, 6040),
                 (5.9562, -7, 6400), (6.014, -16, 7200)]
    out = np.zeros((2, N))
    t60 = 0.016
    for s, db, hz in spit_rows:
        add(out, s, undb(db - 9.0) * puff(foam, s + 0.79, t60, 0.00041), 2.5)
        add(out, s, undb(db + 0.5) * ring(hz, 0.41 * t60, glide=0.064, rise=0.00026), 2.5)
    return out


def stream_slaps(glass, touch):
    """The stream slaps the glass: a short tone, a first touch of noise and a wet aftersound."""
    out = np.zeros((2, N))
    white = rng.standard_normal(N)
    for s, db, hz in SLAPS:
        octaves = np.log2(hz / 1e3)  # above 1 kHz
        pan_db = 1.5 + 4.0 * octaves  # high slaps come from the left wall
        after_db = 1.5 - 4.5 * octaves  # low slaps are wetter
        add(out, s, undb(db) * ring(hz, 0.0077, glide=0.019, rise=0.00045), pan_db)
        add(out, s, undb(db - 19.5) * puff(touch, s, 0.0037, .0001), pan_db)
        wet = band(rung(puff(white, s, 0.069, 0.00026), hz, 0.11 * hz), hz, 0.51 * hz)
        add(out, s, undb(db + after_db) * wet, pan_db)
        add(out, s, undb(db + after_db - 26) * puff(glass, s + .7, 0.059, 0.00026), pan_db)
    return out


def glugs():
    """Air gulps into the can: short low or high notes that slide up."""
    # Each row: start in seconds, level in dB, pitch in Hz.
    glug_rows = [(4.835, -19, 109), (4.904, -10.5, 103), (4.928, -16.5, 259), (4.959, -18, 91.5),
                 (5.189, -16, 94.5), (5.217, -13, 276), (5.254, -12, 97), (5.289, -13.5, 275),
                 (5.33, -13, 116), (5.365, -19, 260), (5.401, -20, 108), (5.431, -14.5, 263),
                 (5.475, -14, 86), (5.754, -15.5, 302), (5.796, -21.5, 114)]
    out = np.zeros((2, N))
    for s, db, hz in glug_rows:
        add(out, s, undb(db + 11.5) * ring(hz, 0.027, glide=0.065, rise=0.0045), 7.5)
    return out


def plops(glass):
    """Big bubbles close: soft notes that slide up in the pool, and knocks on the glass, as two sounds."""
    pool, knocks = np.zeros((2, N)), np.zeros((2, N))
    for s, db, hz, cycles in PLOPS:
        add(pool, s, undb(db + 3.5) * ring(hz, cycles / hz, glide=0.085, rise=0.0046), POUR_PAN_DB)
        add(knocks, s, undb(db - 26) * puff(glass, s + .3, 0.019, 0.00046), POUR_PAN_DB)
    return pool, knocks


def pour():
    """The drink excites the air column, the glass and the foam; the loud slaps, plops and gulps stand out."""
    glass, foam = glass_noise(), foam_noise()
    splash = splash_noise(glass)
    small_pool, small_slaps = small_bubbles()
    big_pool, knocks = plops(glass)
    pool = small_pool + big_pool
    pool = pool + undb(6.0) * band(pool, 607.3, 21.3)  # the heavy glass hums after each plop
    out = air_in_mug() + stream(splash) + foam_fizz(foam) + small_slaps + bubble_spits(foam)
    out = out + stream_slaps(glass, splash + .9 * foam) + glugs() + knocks + pool
    return signal.sosfilt(signal.butter(2, 55, "high", fs=SR, output="sos"), out)


def scene():
    """All sources; the near ones get a short echo of fading noise that differs left and right."""
    near = can() + slide() + pour()
    t = np.arange(int(.3 * SR)) / SR
    room_t60_s, room_db = 0.21, -11.5
    tail = rng.standard_normal((2, len(t))) * undb(-60 * t / room_t60_s) * (t > .002)
    tail = undb(room_db) * tail / np.sqrt(np.sum(tail ** 2, axis=1, keepdims=True))
    return near + signal.oaconvolve(near, tail, axes=1)[:, :N] + background()


def record(dry):
    """Sound reaches the left side a little later; the deepest bass is lost, peaks clip and the top is cut."""
    lag_samples, top_hz = 2, 15900
    heard = np.array([np.roll(dry[0], lag_samples), dry[1]])
    heard = signal.sosfilt(signal.butter(2, 32, "high", fs=SR, output="sos"), heard)
    top_cut = signal.ellip(10, .2, 70, top_hz, fs=SR, output="sos")
    return signal.sosfilt(top_cut, np.clip(heard, -1, 1))


dry = scene()
out = record(dry)
persist_wave(out)
```